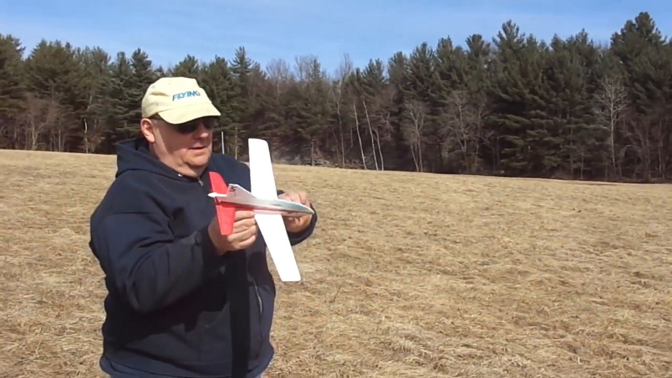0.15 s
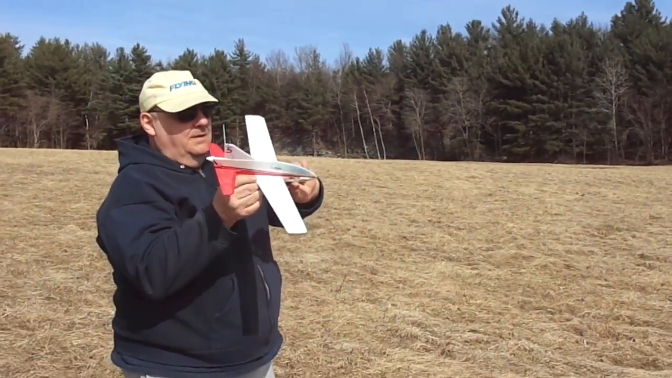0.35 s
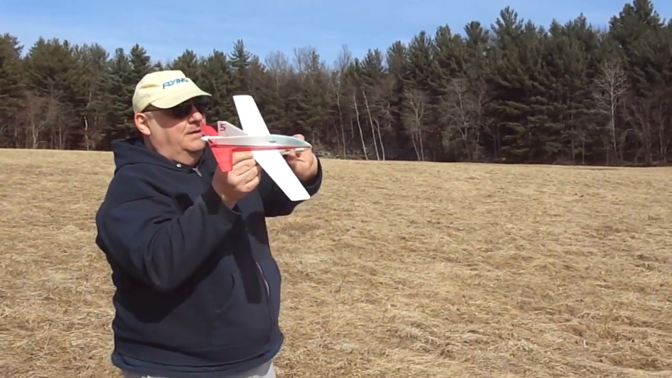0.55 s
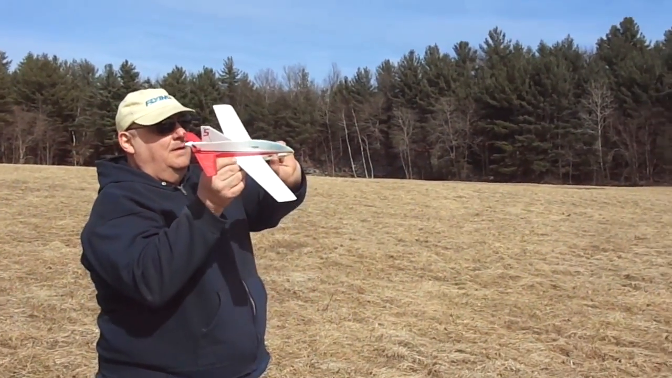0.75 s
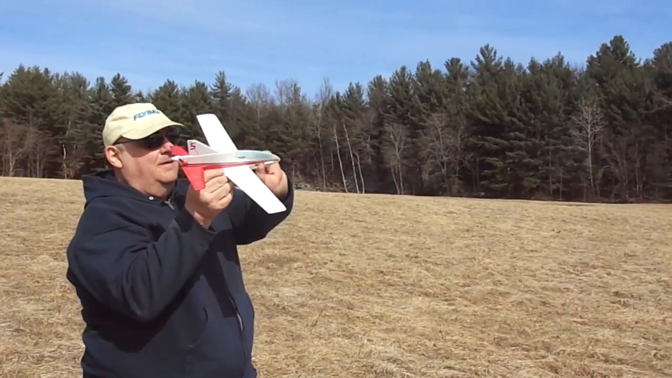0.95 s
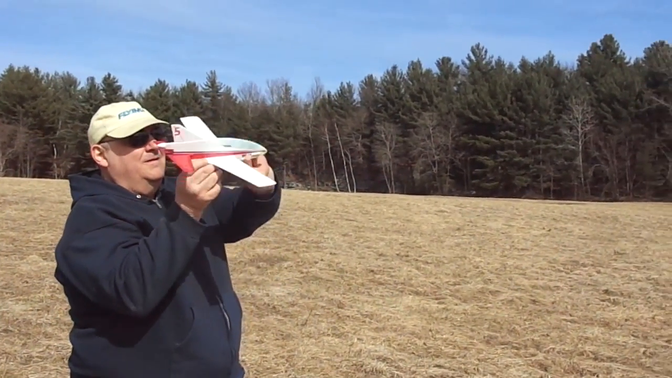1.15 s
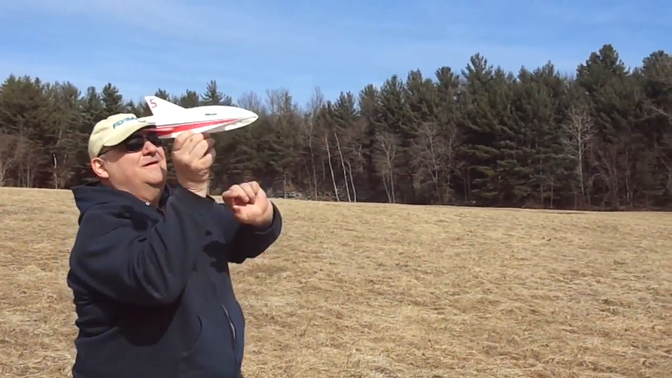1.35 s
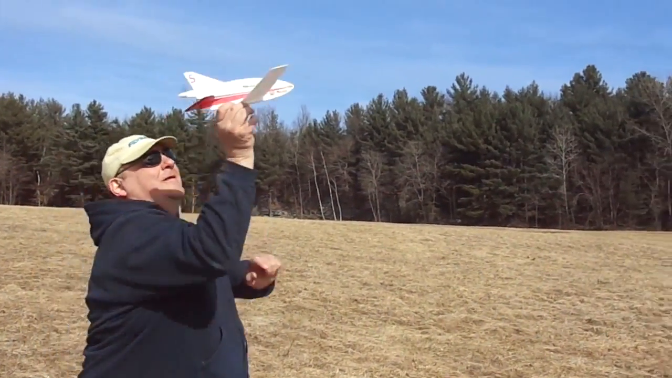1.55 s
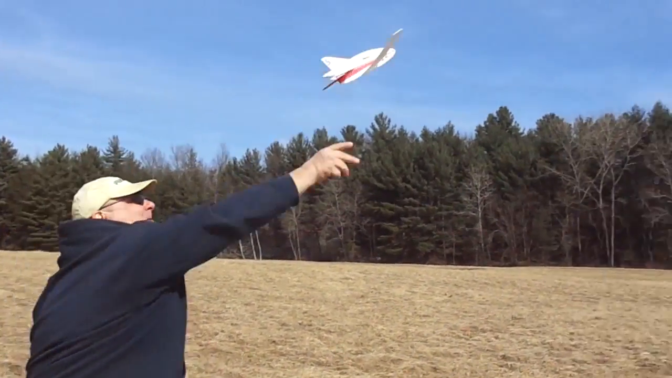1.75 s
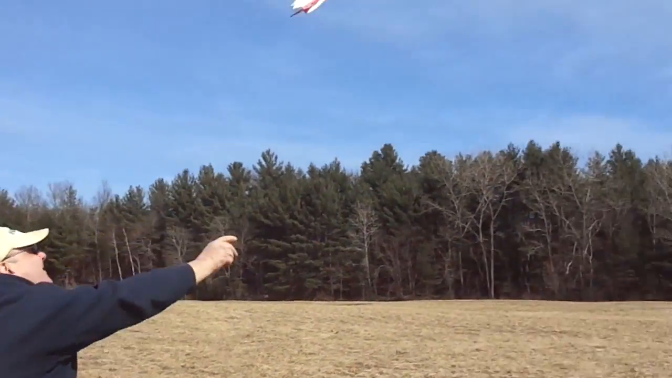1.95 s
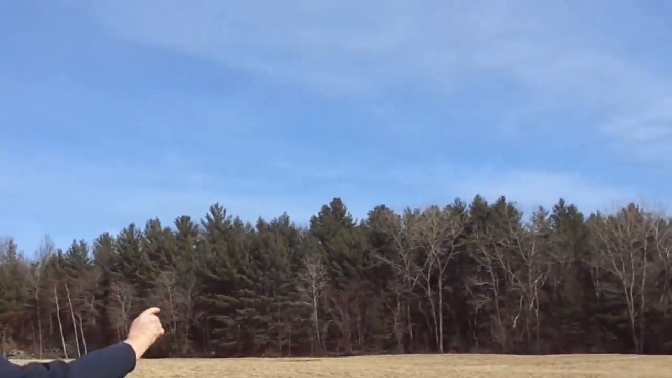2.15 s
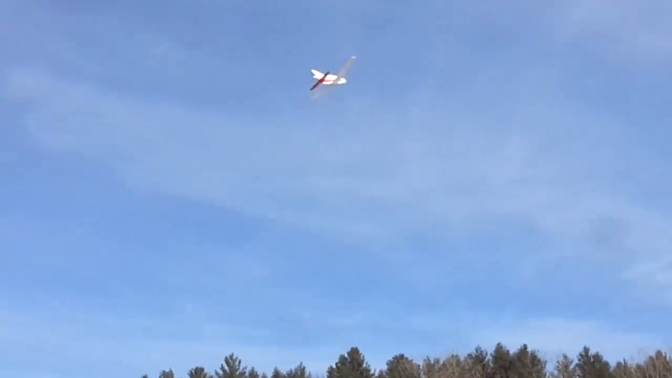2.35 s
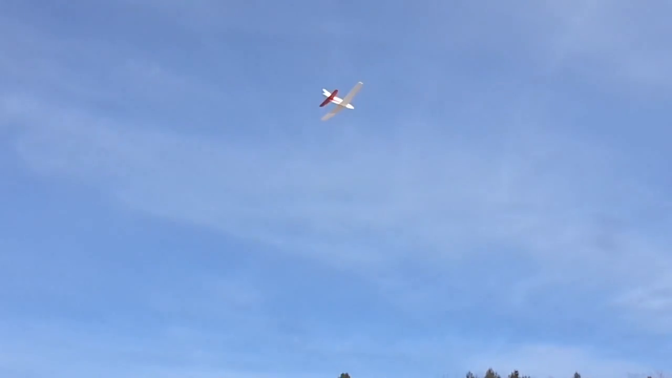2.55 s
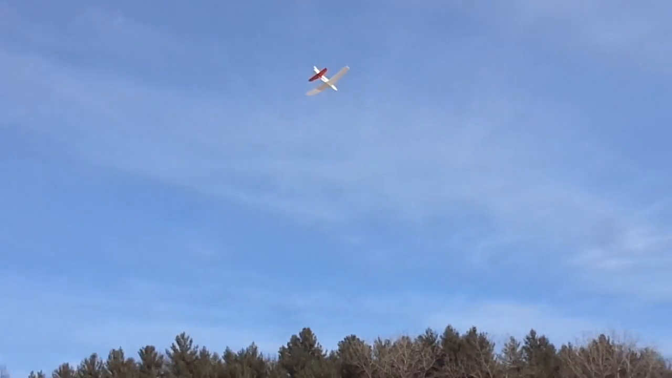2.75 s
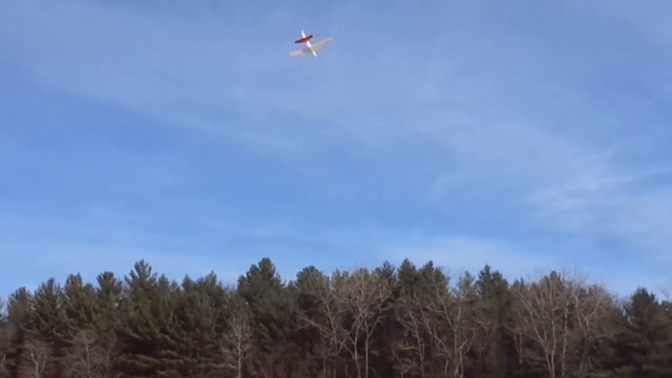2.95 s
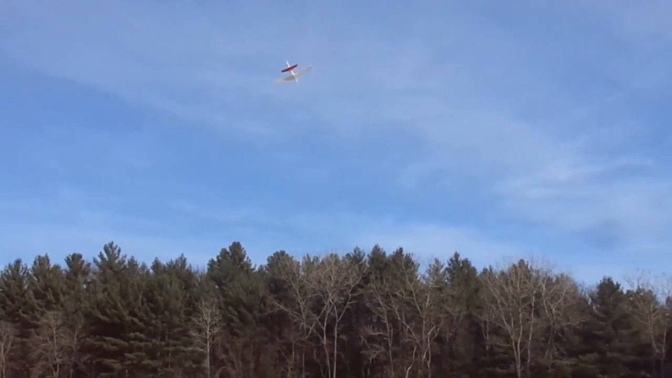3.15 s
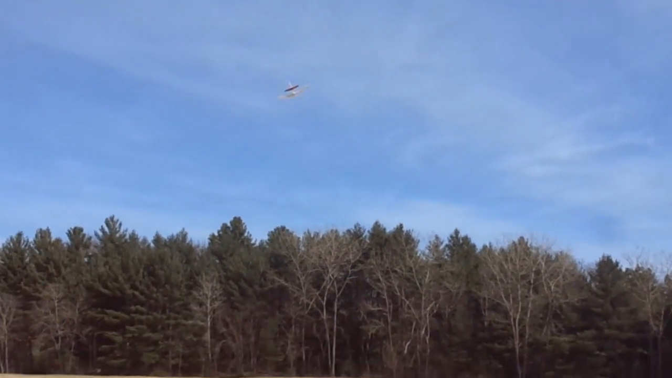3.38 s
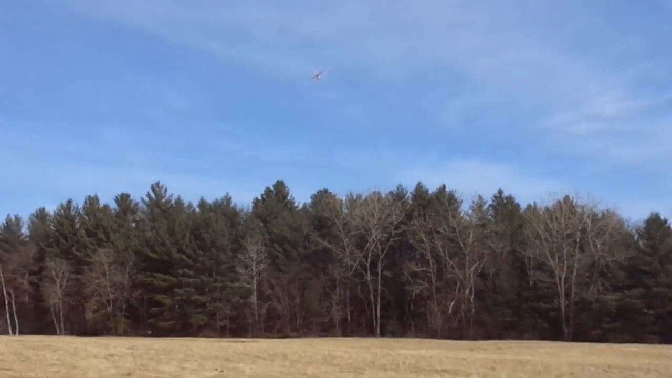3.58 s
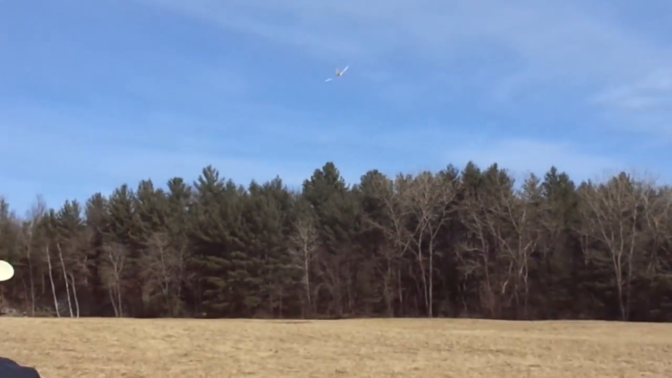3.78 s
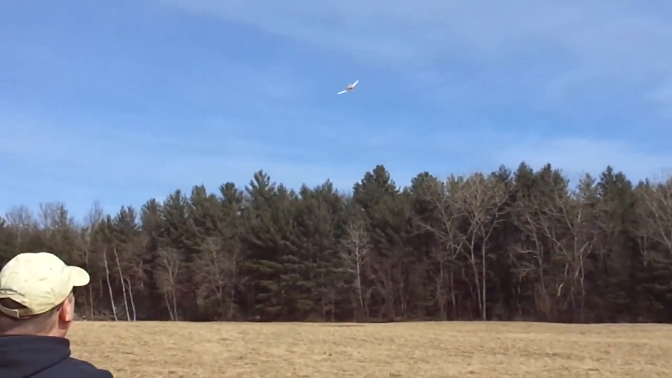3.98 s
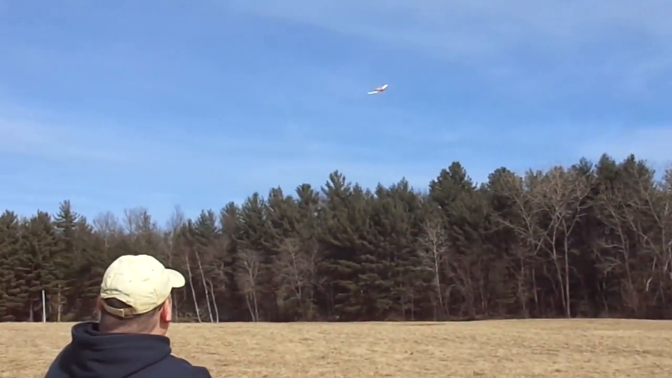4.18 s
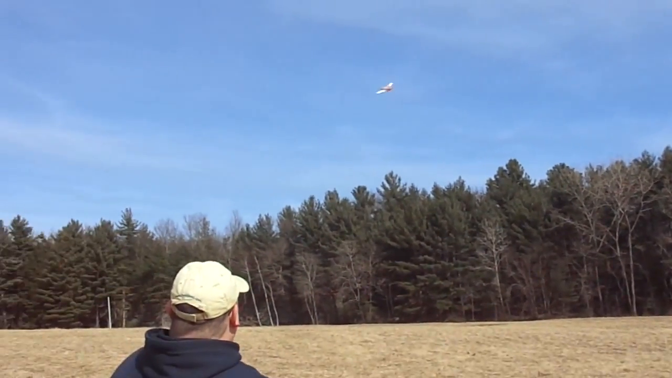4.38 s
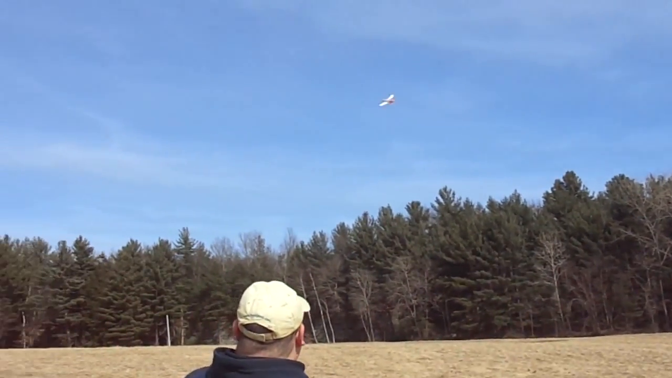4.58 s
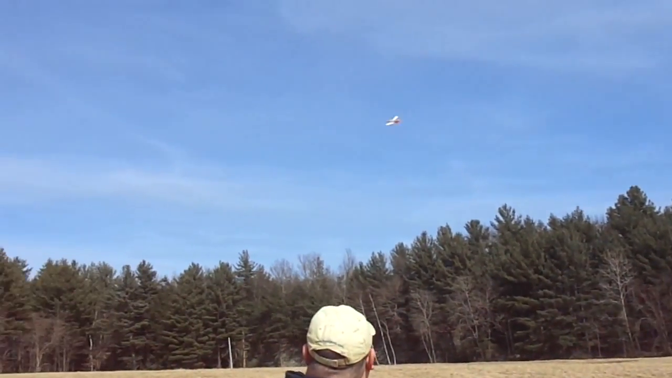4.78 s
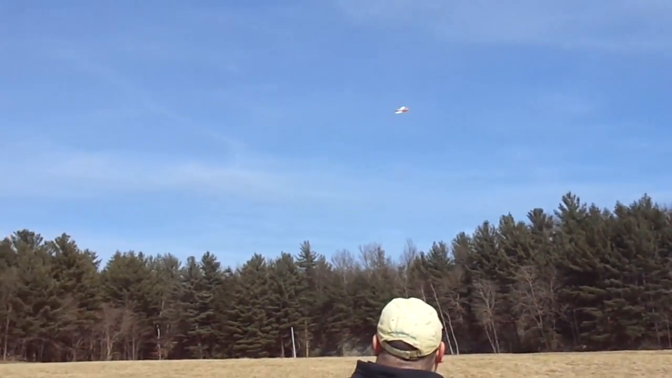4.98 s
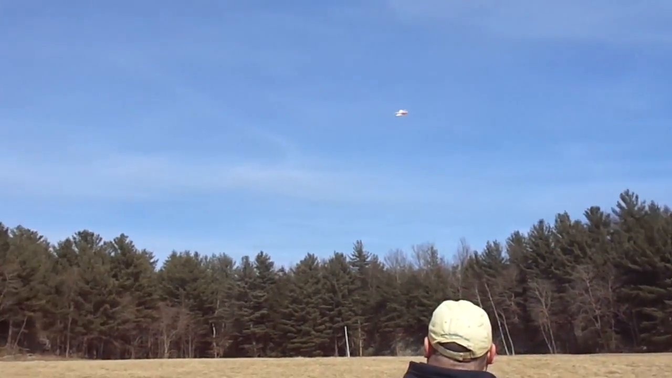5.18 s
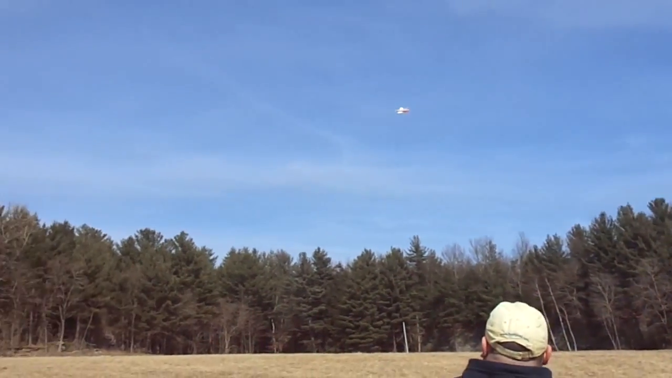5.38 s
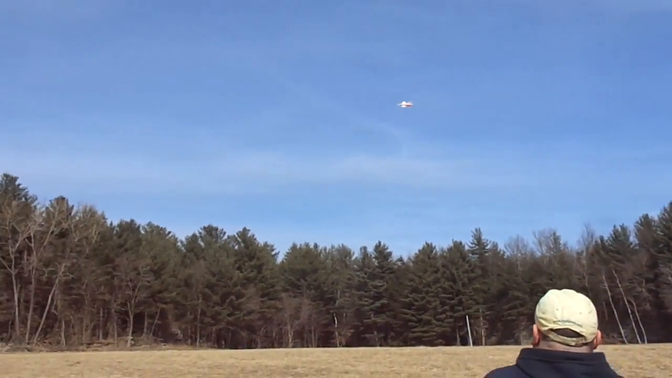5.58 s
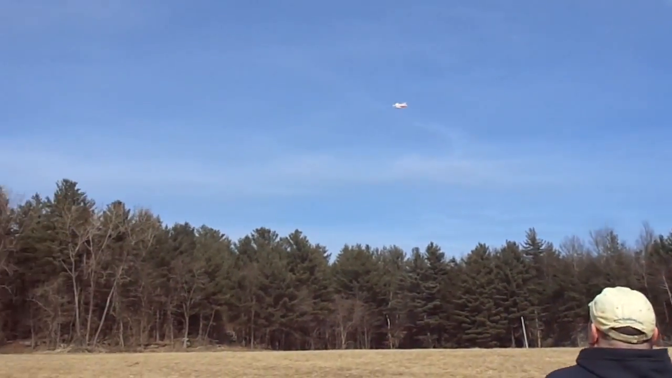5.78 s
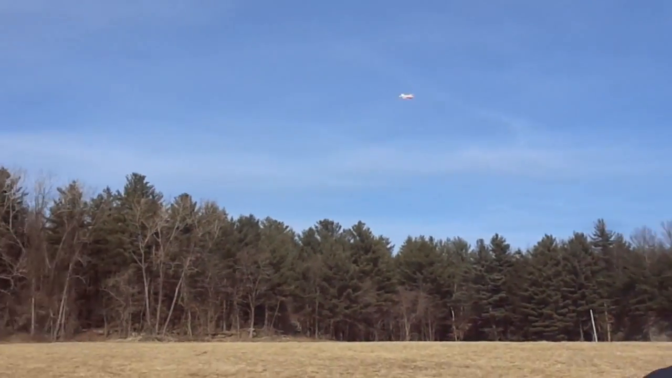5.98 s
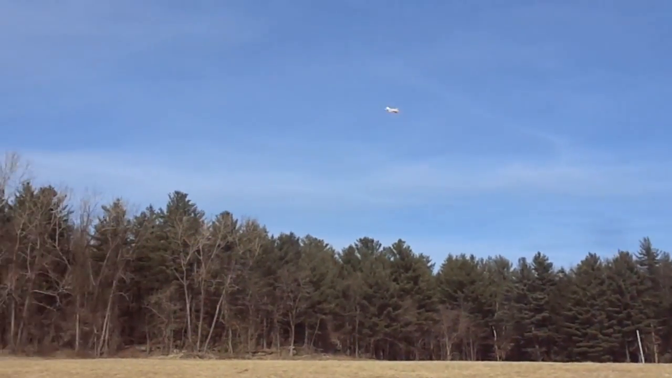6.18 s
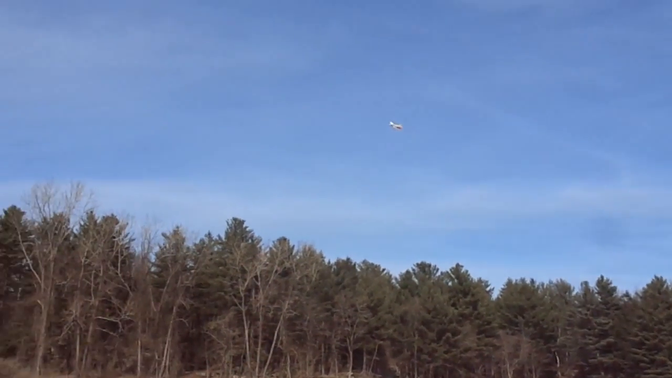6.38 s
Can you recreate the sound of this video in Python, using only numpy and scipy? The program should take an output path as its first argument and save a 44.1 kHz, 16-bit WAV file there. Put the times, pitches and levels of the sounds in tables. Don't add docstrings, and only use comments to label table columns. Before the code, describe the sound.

A foam model jet is launched by hand from a grassy field. First there is only soft airy hush, a barely audible high servo whine and low wind bumps; then the electric fan spins up quickly into a loud buzzy whine wrapped in hiss. It recedes over a few seconds, nearly covered by heavy wind thuds, then partly returns while banking, its tone chopped into a fast flutter. A loud plastic click lands close to the microphone at the end.

```python
import sys
import numpy as np
from scipy import signal
from scipy.io import wavfile
from scipy.ndimage import uniform_filter1d

SR = 44100
rng = np.random.default_rng(int(sys.argv[2]) if len(sys.argv) > 2 else 0)


def transcribe(signal):
    frames = np.atleast_2d(signal).T
    limited = np.clip(frames, -1, 1)
    pcm = np.round(limited * 32767).astype(np.int16)
    wavfile.write(sys.argv[1], SR, pcm)


def how_loud(loudness_db):
    steps = np.asarray(loudness_db, float) / 20
    return 10 ** steps


N = 283563
TIME_S = np.arange(N) / SR

# freq_hz, density_db_per_hz
HUSH_SPECTRUM = [(200, -23), (400, -9.5), (1000, -3), (1600, -2), (2200, -7), (3200, -14), (5000, -18.5),
                 (15000, -21.5)]
HUSH_DB = -52.5
NARROW_HZ, NARROW_DB, WIDE_HZ, WIDE_DB = 1650, 4, 2700, 3
SWELL_PERIOD_S, SWELL_TOP_S = .74, .06
FIRST_WHOOSH_DB, FIRST_WHOOSH_S = 5, .2
SERVO_HZ, SERVO_DB, FLIP_HZ, FLIP_S = 12273, -65.5, 15, .063

# centre_s, half_length_s, rumble_db
GUSTS = [(.13, .1, -47), (.5, .25, -59), (1.8, .12, -54), (.74, .04, -50), (.83, .05, -46),
         (.99, .1, -42.5), (1.09, .03, -46), (1.22, .12, -45.5), (1.44, .07, -43.5), (1.65, .1, -52),
         (2.12, .17, -40.5), (2.47, 0.092, -50.5), (2.8, .07, -42), (3.0, .08, -48), (3.2, 0.089, -47.5),
         (3.35, .1, -41.5), (3.55, .12, -41.5), (3.85, 0.13, -40.5), (4.25, .25, -50), (4.5, .05, -52),
         (4.68, .08, -45), (4.97, .09, -46), (5.27, .06, -49), (5.43, .03, -60), (5.55, .04, -59),
         (5.82, .015, -67), (6.06, .03, -59), (6.22, .04, -59), (6.4, 0.0298, -59)]
CALM_DB = -74
# freq_hz, density_db_per_hz
RUMBLE_SPECTRUM = [(12, -43), (30, -1), (65, 8), (119, 8.5), (243, -0.5), (353, -2.5), (700, -17.5),
                   (910, -51)]
DULL_SLOPE, BRIGHT_DB, DULL_FROM_HZ = 0.36, -40, 132
# centre_s, peak_db, pitch_hz
PUFFS = [(0.76, -25, 230), (0.78, -24, 174), (0.88, -25, 131), (0.899, -25, 182), (0.916, -29, 181),
         (0.964, -21.5, 258), (0.997, -22, 151), (1.012, -22.5, 257), (1.033, -26, 215),
         (1.057, -24, 153), (1.427, -32, 217), (1.444, -27.5, 190), (1.87, -32, 177),
         (1.973, -31, 172), (2.007, -28, 192), (2.048, -30, 186), (2.067, -28, 269),
         (2.111, -24, 289.3), (2.147, -20, 326), (2.224, -28, 184), (2.288, -30, 286),
         (2.309, -31, 129), (2.745, -29, 132), (2.765, -29, 182), (2.795, -33, 182),
         (2.809, -32, 235), (2.839, -31, 189), (2.874, -24.5, 214), (3.144, -29, 230),
         (3.164, -24, 276), (3.191, -25, 181), (3.276, -20.5, 236), (3.306, -22, 182),
         (3.32, -23, 296), (3.354, -25, 178.2), (3.378, -29, 196), (3.402, -22.5, 214),
         (3.462, -27, 227), (3.513, -31, 170), (3.551, -34, 190), (3.683, -28, 174),
         (3.755, -20.5, 252), (3.823, -15, 259), (3.85, -19.5, 226), (3.88, -25, 174),
         (3.896, -29, 111), (3.962, -22.5, 182), (3.976, -30, 140), (4.075, -34, 138),
         (4.246, -30, 138), (4.637, -28.5, 223.8), (4.727, -31, 181), (4.739, -30, 121),
         (4.973, -33, 157), (5.005, -33, 155), (5.248, -33, 115.9), (5.3, -34, 148),
         (5.475, -28.5, 212), (6.08, -26, 280), (6.22, -30, 279),
         (.075, -40, 110), (.15, -42, 130), (.19, -44, 160), (.24, -47, 100), (3.13, -33, 150),
              (3.317, -27, 400), (3.58, -33, 140), (3.744, -26, 170), (4.02, -34, 160), (4.33, -36, 150),
              (4.9, -37, 120), (4.95, -36, 140), (6.04, -41, 160), (6.085, -36, 100), (6.15, -44, 110),
              (6.19, -43, 120), (6.25, -42, 150)]
EDDY_OVER_DB, EDDY_SPREAD_DB, EDDY_LO_HZ, EDDY_HI_HZ = 1, 6, 140, 260

# start_s, peak_db
TICKS = [
    (1.0263, -32),
    (6.3101, -17.5),
]
# freq_hz, level_db, t60_s
TICK_MODES = [(950, -8, .015), (1900, -2, .02), (2560, 0, 0.021), (3870, 3, 0.0078), (4600, 5, 0.008),
              (5900, 8, 0.0057), (7550, 4, .004), (8500, 13, 0.0032), (10400, -7, .003), (13000, -14, .003)]

# time_s, shaft_hz
SHAFT_SPEED = [(1.35, 287.7), (1.45, 286.1), (1.55, 284.6), (1.65, 289.9), (1.75, 286.5), (2.05, 283.7),
               (2.3, 279.1), (2.75, 280.4), (3.2, 278.9), (3.5, 277.5), (3.95, 274), (4.15, 271.2),
               (4.7, 270.5), (5.15, 268.1), (5.6, 266.4), (6.2, 266.2), (6.35, 262), (6.43, 254)]
# centre_s, half_length_s, shift_hz
SWAY = [(1.423, 0.098, 0.57), (1.6, 0.041, -1.6), (1.76, .06, 1.0), (2.05, 0.079, -1.22), (2.25, 0.059, .7),
        (2.47, .13, -1.8), (2.87, .09, -1.9), (3.2, 0.098, 0.36), (4.32, .12, -1.8), (4.62, .1, -.8),
        (5.04, 0.069, 1.2), (5.2, .06, -1.2), (5.45, .12, .7), (5.9, .18, -2.5)]
SPIN_FROM_S, SPIN_S, SPIN_LAG_HZ, SPIN_BEND = 1.1, .25, 99.55, 1.65
# time_s, level_db
START = [
    (1.03, -21.5),
    (1.04, -44.5),
    (1.16, -20.5),
    (1.19, -13),
    (1.22, -24.5),
]
# time_s, roar_db, angle_deg (from the nose round to the microphone)
FLIGHT = [(1.27, -22.5, 81.7), (1.35, -22, 96), (1.57, -21.5, 91), (1.75, -21, 131), (1.9, -23, 128),
          (2.19, -28, 150), (2.41, -30, 164), (2.76, -33, 169), (3.3, -40.5, 174), (3.78, -47, 200),
          (4.02, -42, 232), (4.13, -38, 244.5), (4.68, -35, 258.5), (5.0, -35, 270), (6.3, -35.5, 275),
          (6.43, -33, 259)]

# centre_s, depth_db
DROPOUTS = [(3.902, 2), (3.919, 8), (3.94, 1), (3.957, 4), (3.997, 3), (4.036, 4), (4.073, 3), (4.092, 3),
            (4.112, 4), (4.148, 3), (4.171, 12), (4.203, 4), (4.243, 1), (4.259, 5), (4.279, 6), (4.3, 4),
            (4.325, 8), (4.358, 7), (4.389, 5), (4.424, 11), (4.453, 7), (4.485, 7), (4.512, 9), (4.546, 4),
            (4.567, 2), (4.61, 9), (4.636, 11), (4.661, 3), (4.694, 8), (4.75, 5), (4.779, 4), (4.799, 2),
            (4.838, 1), (4.86, 10), (4.917, 5), (4.944, 9), (4.978, 8), (5.012, 7), (5.042, 7), (5.071, 8),
            (5.097, 6), (5.128, 15), (5.156, 6), (5.179, 4),
            (5.234, 4), (5.26, 5), (5.282, 6), (5.307, 3), (5.34, 7), (5.366, 5.5), (5.43, 5),
                 (5.457, 9), (5.484, 9), (5.514, 7), (5.542, 11), (5.575, 3), (5.593, 4), (5.62, 8),
                 (5.651, 7), (5.678, 4), (5.706, 6), (5.729, 8), (5.751, 9), (5.782, 3), (5.828, 7),
                 (5.853, 6), (5.885, 6), (5.905, 11), (5.934, 5), (5.962, 9), (5.999, 3), (6.036, 9),
                 (6.079, 12), (6.118, 7), (6.135, 5), (6.188, 14), (6.228, 4), (6.262, 9), (6.326, 10),
                 (6.372, 6), (6.391, 4)]
DROPOUT_LAG_RAD_PER_DB = .022
# time_s, rate_hz
THROB_RATE = [(1.4, 42), (1.6, 42), (1.95, 51), (3.0, 53), (3.75, 54), (4.2, 49), (4.6, 33), (5.3, 32.3),
              (6.0, 27.2), (6.43, 28)]
# angle_deg, throb_depth_0_1, lower_side_db, upper_side_db (of order 5, over the roar)
THROB_BEAM = [(60, 0.067, -45, -45), (90.5, 0.047, -30, -17), (131, 0.025, -37, -44), (148, .15, -10.5, -21),
              (179, 0.15, -36, -23), (222.6, .2, -19, -5), (252, 0.053, -22, -18), (270, 0.033, -14, -17)]

# freq_hz, density_db_per_hz
NEAR_SPECTRUM = [(250, -53), (450, -24.5), (700, -24), (900, -14), (1400, -13.5), (2100, -5.5), (4000, -9),
                 (15000, -17)]
# freq_hz, density_db_per_hz
FAR_SPECTRUM = [(250, -37), (500, -18.5), (680, -22), (900, -14), (1600, -12), (2600, -7), (9000, -13),
                (15000, -18)]
# freq_hz, width_hz, near_db, far_db
DUCT_MODES = [(862, 62, 7.5, 14), (1280, 38, 5, -4.5), (1311, 137, 8.5, 14), (1900, 90, 3, 11),
              (2180, 180, -1.5, 5.5), (2574, 125, 5, 2.5), (2930, 460, 0.5, 4.5), (3663, 100, 3.5, 8),
              (4730, 68, -4, -1), (5320, 110, -4, -1), (7040, 268, 1, 2)]
# angle_deg, air_6khz_db, air_12khz_db, mouth_whistle_db, ground_bounce_0_1
AIR_BEAM = [(60, 0, 0.5, 5, 0.01), (94, -2.5, 0, -4, .01), (125, -1.5, -1, 7, 0.099),
            (140, -0.8, 1, 4, 0.22), (179, 2.5, 7.5, 0.5, 0.18), (228, 4, 10.5, 5, 0.14),
            (255, 0, 0, -1, 0.13), (276.8, -6, -3, 1, 0.16)]
GROUND_BOUNCE_MS = 0.376

# angle_deg, order3_db, order5_db, order7_db, order10_db, order4_db (over the roar)
TONE_BEAM = [(63.7, -27, -10.5, -24, -5, -11), (92, -4, -0.5, -2.5, -24.5, -23),
             (124, -3.5, -4, -7.5, -21.5, -23), (179.4, -14.5, -9.5, -14, -7.5, -52),
             (218, -11, -1.5, -14, -16.5, -36), (252, -14, -5.5, -21.5, -16, -38),
             (269, -12.5, -.8, -19.5, -19, -28)]
TONE_TOP_DB = -22
# order, beam_column, offset_db
ORDER_RULE = [(1, 3, -11.5), (2, 1, -24.5), (3, 0, -0.5), (4, 4, 2.5), (5, 1, -2), (6, 3, -6.5),
              (7, 2, 1.5), (8, 2, -5), (9, 3, -2.5), (10, 3, 2), (11, 3, -4.5), (12, 3, -17), (13, 3, -7),
              (14, 3, -6), (15, 3.5, -8.5), (16, 4, -26), (17, 4, -23)]
# centre_s, change_db, half_length_s
ORDER_FADES = [
    [(1.24, -9, 0.035), (1.55, -3, 0.066), (1.7, 2.5, 0.059), (2.81, -10, .07), (3.05, 8, 0.14),
     (3.27, -4, 0.034), (3.52, 13.5, 0.22), (3.82, -12, 0.066), (6.2, -6, 0.17)],
    [(1.12, -8, 0.027), (1.226, -3, 0.022), (1.27, -8, .02), (2.05, 2.5, .08), (2.73, -1, 0.063),
     (2.9, 6, 0.061), (3.42, -25, 0.12), (3.72, 8, 0.1), (3.97, -15, 0.089), (5.32, 3.5, 0.19)],
    [(1.17, -5, .05), (1.72, -6, 0.05), (2.2, 4, .13), (2.65, -7, 0.19), (3.05, -11, .05), (4.4, 8, 0.091),
     (5.9, 6, .09), (6.2, 10, .08), (6.35, -9, .06)],
    [(1.55, -7, .06), (1.75, -3, .08), (2.1, -4, .1), (2.4, -5, 0.16), (2.85, -0.5, .07), (3.35, 3, .18),
     (5.2, -11, 0.18), (6.05, -18, 0.074)],
    [(1.23, -2, 0.028)],
]
# centre_s, half_length_s, level_db, pitch_hz
BODY_SONG = [(2.57, 0.27, -52, 998), (3.06, .12, -47, 996), (3.4, .07, -49, 998), (5.25, .15, -47, 1282),
             (5.9, 0.33, -48, 1282), (5.92, .04, -50, 583)]

# centre_s, length_s, from_hz, to_hz
SPLITS = [(.06, .03, 300, 15000), (.94, .17, 300, 14000), (1.2, .06, 1000, 15000), (1.5, .03, 9000, 11000),
          (1.66, .08, 500, 15000), (1.84, .04, 1000, 15000), (1.94, .03, 7500, 9200),
          (2.08, .03, 7500, 9200), (2.29, .03, 4200, 5800), (2.52, .03, 9000, 12000),
          (3.33, .03, 4700, 8400), (4.39, .09, 200, 14000), (4.61, .04, 200, 13500),
          (6.04, .04, 200, 14000), (6.31, .04, 4300, 15000)]


def evened(x):
    return x / np.sqrt(np.mean(x ** 2) + 1e-20)


def read(points, hz):
    f, value = np.transpose(points)
    return np.interp(np.log(hz + 1), np.log(f + 1), value)


def columns(rows, t):
    s, *values = np.transpose(rows)
    return [np.interp(t, s, v) for v in values]


def bumps(rows, t):
    return sum(how_loud(db) * np.exp(-((t - s) / half) ** 2) for s, half, db in rows)


def wander(size):
    step = size // 8
    coarse = rng.standard_normal(N // step + 2)
    coarse = uniform_filter1d(uniform_filter1d(coarse, size=8), size=8)
    return np.interp(np.arange(N) / step, np.arange(len(coarse)), evened(coarse))


def noise(field_db, patchy_db, size=1024):
    hz = np.fft.rfftfreq(size, 1 / SR)[:, None]
    s = np.arange(4 * N // size + 5) * size / 4 / SR
    a, b, patches, drifts = rng.standard_normal((len(s), len(hz), 4)).T
    patches = evened(uniform_filter1d(uniform_filter1d(patches, size=9, axis=0), size=13, axis=1))
    patches += evened(uniform_filter1d(uniform_filter1d(drifts, size=7, axis=0), size=60, axis=1))
    z = (a + 1j * b) * how_loud(field_db(hz, s) + patchy_db * patches)
    return signal.istft(z, nperseg=size, noverlap=3 * size // 4)[1][:N]


def tone(db, phase, flutter_db, smear_rad):
    level = how_loud(db + flutter_db * wander(size=2000))
    return np.sqrt(2) * level * np.cos(phase + smear_rad * wander(size=400))


def add(mix, s, sound):
    part = mix[round(s * SR) - len(sound) // 2:][:len(sound)]
    part += sound[:len(part)]


def whoosh_db(hz, s):
    bands_db = NARROW_DB * np.exp(-((hz - NARROW_HZ) / 200) ** 2)
    bands_db = bands_db + WIDE_DB * np.exp(-((hz - WIDE_HZ) / 800) ** 2)
    first_db = FIRST_WHOOSH_DB * np.exp(-((hz - NARROW_HZ) / 90) ** 2 - (s / FIRST_WHOOSH_S) ** 2)
    return first_db + bands_db * np.cos(2 * np.pi * (s - SWELL_TOP_S) / SWELL_PERIOD_S)


def hush():
    far = noise(lambda hz, s: read(HUSH_SPECTRUM, hz) + whoosh_db(hz, s), patchy_db=0.64)
    flips = np.tanh(3 * np.sin(2 * np.pi * FLIP_HZ * (TIME_S - FLIP_S)))
    servo = np.sqrt(2) * how_loud(SERVO_DB) * flips * np.cos(2 * np.pi * SERVO_HZ * TIME_S)
    return how_loud(HUSH_DB) * evened(far) + servo * (TIME_S < 1.2)


def rumble(gust):
    under_db = np.clip(BRIGHT_DB - 20 * np.log10(gust), 0, 20)

    def field_db(hz, s):
        octaves = np.log2(np.maximum(hz / DULL_FROM_HZ, 1))
        return read(RUMBLE_SPECTRUM, hz) - DULL_SLOPE * np.interp(s, TIME_S, under_db) * octaves

    lumps = gust * how_loud(2.5 + 4.3 * wander(size=350) + 1.3 * wander(size=2500))
    return lumps * evened(noise(field_db, patchy_db=4.0, size=2048))


def small_eddies(gust):
    place, size, pitch = rng.random((8, 3)).T
    at_s = np.interp(place, np.cumsum(gust) / gust.sum(), TIME_S)
    at_s = np.clip(at_s, .05, TIME_S[-1] - .05)
    peak_db = 20 * np.log10(np.interp(at_s, TIME_S, gust)) + EDDY_OVER_DB - EDDY_SPREAD_DB * size
    return list(zip(at_s, peak_db, EDDY_LO_HZ + (EDDY_HI_HZ - EDDY_LO_HZ) * pitch))


def wind():
    gust = how_loud(CALM_DB) + bumps(GUSTS, TIME_S)
    out = rumble(gust)
    puffs = PUFFS + small_eddies(gust)
    for (s, db, hz), (start, slide) in zip(puffs, rng.random((len(puffs), 2))):
        u = np.linspace(-2.5, 2.5, round(2.9 * SR / hz))
        cycle = np.cos(3.65 * u + (slide - .5) * u ** 2 + 2 * np.pi * start)
        add(out, s, how_loud(db - 0.4) * np.exp(-u ** 2) * cycle)
    return out


def ticks():
    out, t = np.zeros(N), np.arange(-1500, 1500) / SR
    for s, db in TICKS:
        ring = sum(how_loud(mode_db - 60 * abs(t) / t60_s) * np.sin(2 * np.pi * hz * t)
                   for hz, mode_db, t60_s in TICK_MODES)
        add(out, s, how_loud(db - 7.5) * ring * np.clip(t / .0002, 0, 1))
    return out


def shaft_hz(t):
    sway_hz = sum(hz * np.exp(-((t - s) / half) ** 2) for s, half, hz in SWAY)
    lag = np.clip(1 - (t - SPIN_FROM_S) / SPIN_S, 0, 1) ** SPIN_BEND
    return columns(SHAFT_SPEED, t)[0] + sway_hz - SPIN_LAG_HZ * lag


def flight(t):
    roar_db = columns(START + [row[:2] for row in FLIGHT], t)[0]
    return roar_db, columns(FLIGHT, t)[1]


def throb_and_dropouts():
    rate_hz = columns(THROB_RATE, TIME_S)[0]
    depth = columns(THROB_BEAM, flight(TIME_S)[1])[0]
    throb = 2 * np.pi * np.cumsum(rate_hz * (1 + 0.045 * wander(size=1500))) / SR
    gain = 1 + depth * np.clip(1 + .5 * wander(size=2500), 0, 2) * np.cos(throb)
    drop_db = np.zeros(N)
    for s, db in DROPOUTS:
        add(drop_db, s, 1.14 * db * np.hanning(850))
    return throb, gain, drop_db


def roar(shaft):
    def field_db(hz, s):
        far = np.interp(s, [2.2, 4.1], [0, 1])
        colour = (1 - far) * read(NEAR_SPECTRUM, hz) + far * read(FAR_SPECTRUM, hz)
        for f, width, near_db, far_db in DUCT_MODES:
            colour += ((1 - far) * near_db + far * far_db) / (1 + (2 * (hz - f) / width) ** 2)
        order = hz / shaft_hz(s)
        colour += 2.0 * np.exp(-((order - np.round(order)) / 0.17) ** 2) * (order < 17.5)
        body = (hz > 1500) & (hz < 4000)
        colour -= 10 * np.log10((how_loud(colour) ** 2 * body).sum(0) * 8 / 3)
        body_db, angle_deg = flight(s)
        *airs_db, whistle_db, bounce = columns(AIR_BEAM, angle_deg)
        for f, width, air_db in zip((6200, 12000), (2600, 3800), airs_db):
            colour += np.exp(-((hz - f) / width) ** 4) * air_db
        colour += whistle_db / (1 + ((hz - 8300) / 450) ** 2)
        echo = np.clip(bounce, 0, .9) * np.clip(hz / 6000, 0, 1)
        echo = echo * np.exp(2j * np.pi * hz * GROUND_BOUNCE_MS / 1000)
        return colour + 20 * np.log10(abs(1 + echo)) + body_db + 2.0
    return noise(field_db, patchy_db=1.24) * (1 + 0.097 * np.cos(shaft))


def whine(shaft, throb):
    roar_db, angle_deg = flight(TIME_S)
    lead_db = np.minimum(roar_db, TONE_TOP_DB) + np.array(columns(TONE_BEAM, angle_deg))
    lead_db += [sum(db * np.exp(-((TIME_S - s) / half) ** 2) for s, db, half in rows)
                for rows in ORDER_FADES]
    smear_rad = np.interp(TIME_S, [1.2, 1.3, 1.36, 4.0, 4.3], [.15, .5, .07, .1, .12])
    out = np.zeros(N)
    for order, column, offset_db in ORDER_RULE:
        phase = round(order) * (shaft + order)
        raggedness = smear_rad * (.7 + (order / 7.5) ** 2)
        out += tone(lead_db[round(column)] + offset_db, phase, .4 + .17 * order, raggedness)
    lower_db, upper_db = roar_db + np.array(columns(THROB_BEAM, angle_deg)[1:])
    out += tone(lower_db, 5 * shaft - throb, 2.7, 0.32)
    out += tone(upper_db, 5 * shaft + throb, 1.9, 0.29)
    for *swell, hz in BODY_SONG:
        out += bumps([swell], TIME_S) * tone(0, 2 * np.pi * hz * TIME_S, 3.0, 0.17)
    return out


def plane():
    shaft = 2 * np.pi * np.cumsum(shaft_hz(TIME_S) * (1 + .0007 * wander(size=3000))) / SR
    throb, gain, drop_db = throb_and_dropouts()
    spinning = np.interp(TIME_S, [1.1, 1.14], [0, 1])
    tones = whine(shaft - DROPOUT_LAG_RAD_PER_DB * drop_db, throb)
    fan = how_loud(1.5 - 0.56 * drop_db) * roar(shaft) + spinning * how_loud(-1.3 * drop_db) * tones
    switched_on = np.interp(TIME_S, [1.025, 1.06], [0, 1])
    return switched_on * gain * fan


def scene():
    band = signal.firwin(801, 15040, window=("kaiser", 9), fs=SR)
    heard = signal.oaconvolve(hush() + wind() + plane(), band, "same")
    return np.tile(heard + ticks(), (2, 1))


def low_pass(x):
    return signal.sosfilt(signal.butter(12, 15970, fs=SR, output="sos"), x)


def record(dry):
    hz, t, z = signal.stft(dry[0], SR, nperseg=1024)
    apart = sum((abs(t - s) < length / 2) * ((hz > lo) & (hz < hi))[:, None]
                for s, length, lo, hi in SPLITS)
    turned = np.exp(2j * np.pi * rng.random(z.T.shape).T)
    tilt = (hz[:, None] / 3000) ** 0.51
    grit = signal.istft(z * apart * tilt * turned, SR, nperseg=1024)[1][:N]
    return low_pass(dry + how_loud(-18.0) * np.outer([1, -1], grit))


dry = scene()
out = record(dry)
transcribe(out)
```